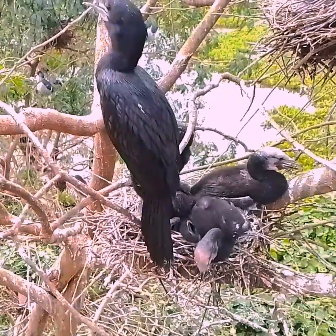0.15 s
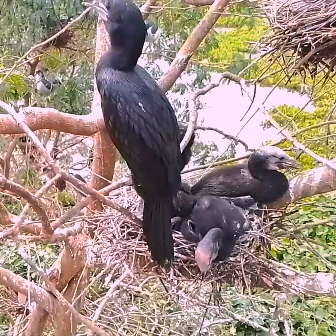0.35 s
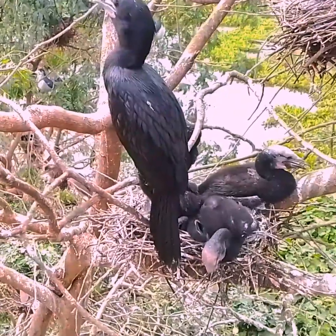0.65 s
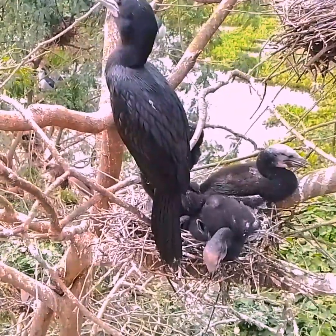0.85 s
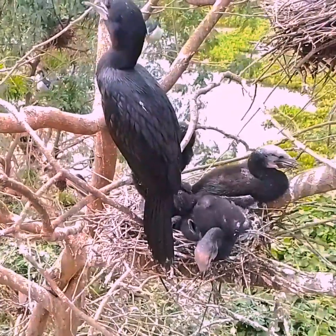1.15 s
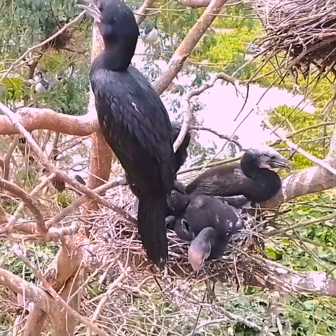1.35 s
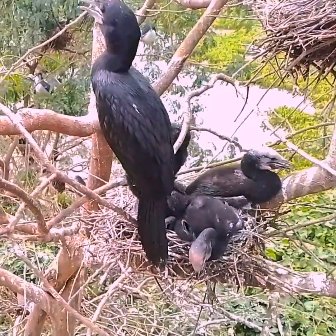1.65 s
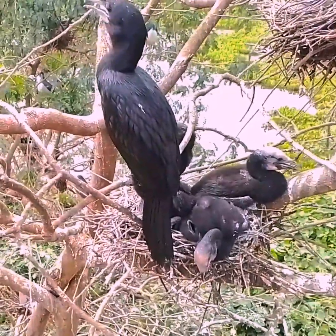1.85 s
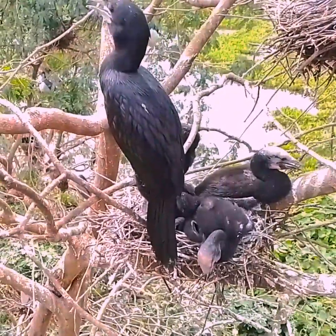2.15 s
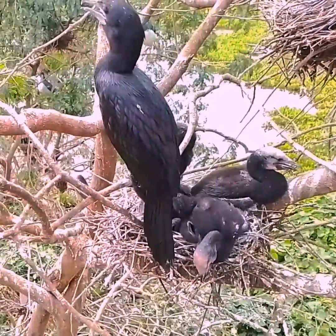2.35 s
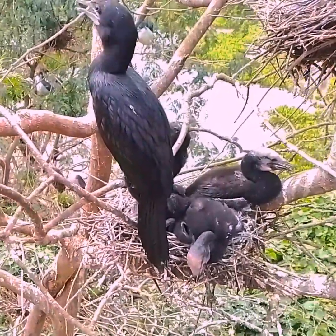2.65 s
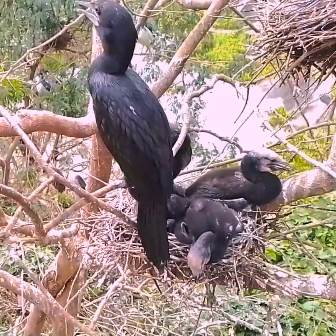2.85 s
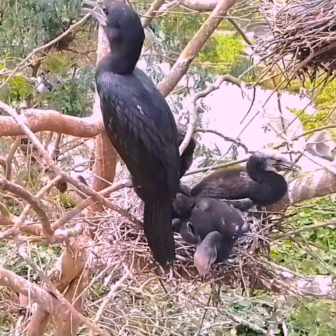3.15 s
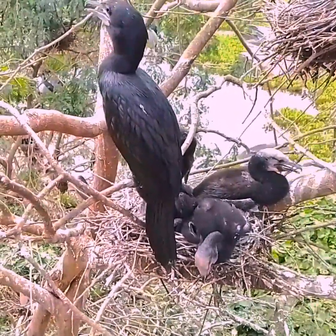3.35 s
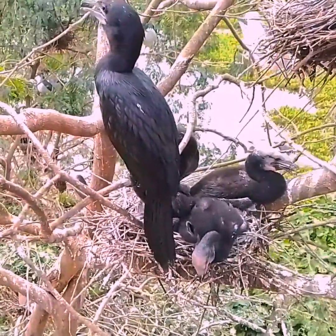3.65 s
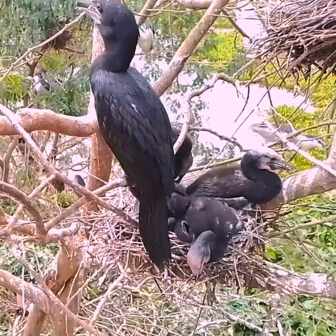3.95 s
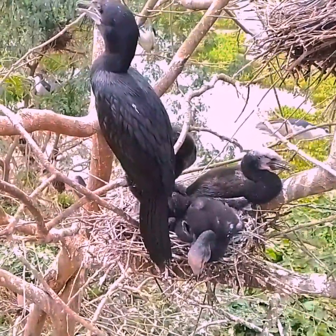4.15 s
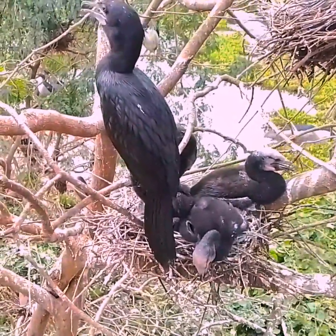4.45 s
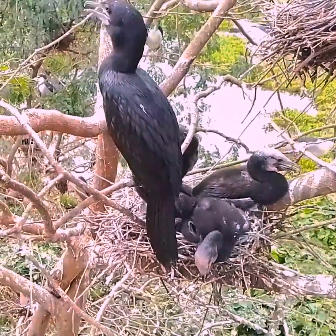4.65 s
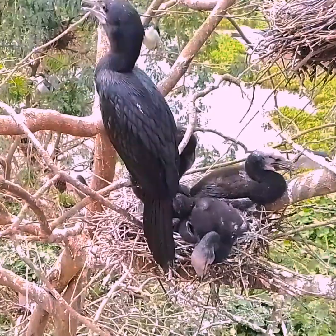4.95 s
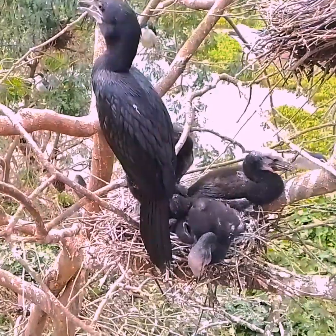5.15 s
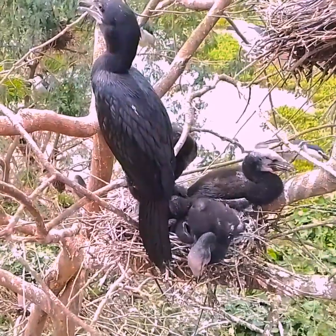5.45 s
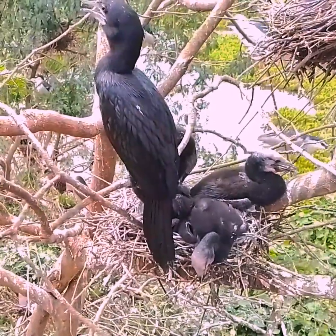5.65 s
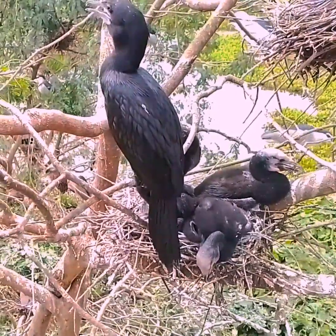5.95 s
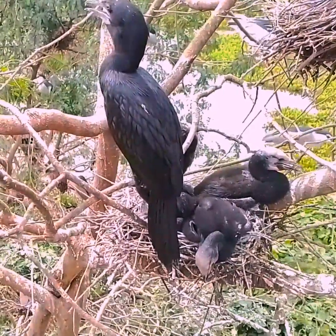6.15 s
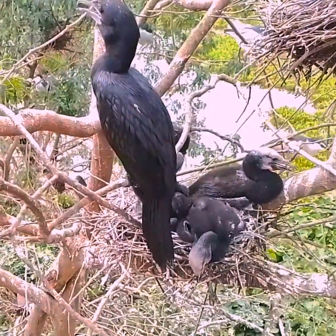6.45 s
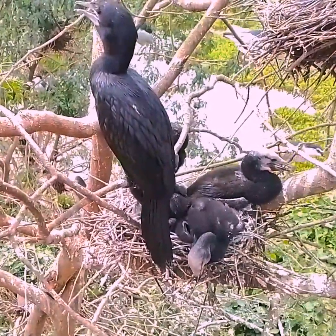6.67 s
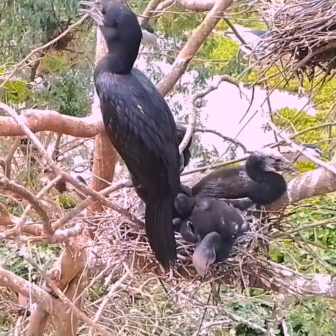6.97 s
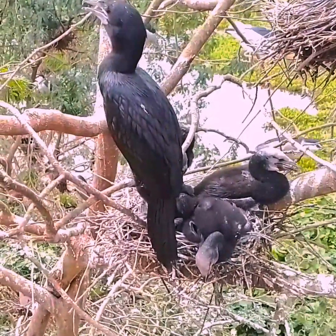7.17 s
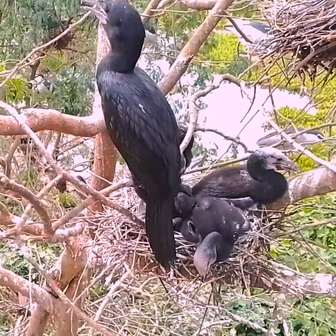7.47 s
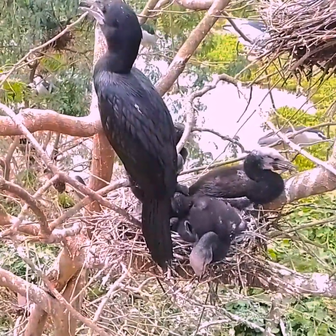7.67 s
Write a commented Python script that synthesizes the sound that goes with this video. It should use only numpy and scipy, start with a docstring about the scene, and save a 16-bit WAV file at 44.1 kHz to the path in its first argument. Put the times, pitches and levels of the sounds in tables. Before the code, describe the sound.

A nesting colony of waterbirds chatters and clicks, joined by raspy, wheezy calls, a few short barks and a light breeze.

```python
"""Waterbird chicks beg all round in short rattling chaks: throat pulses filtered by throat and beak.
An adult barks three arched kwoks, other birds whistle thinly, cry and cluck, and two hoarse ones rasp
by driving turbulent breath through resonances. The far colony blurs into a bed of noise, and leaves
and trunks scatter echoes. The scene is heard by a phone with two unlike ports, buffeted by a breeze."""
import sys
import numpy as np
from scipy import signal
from scipy.fft import rfft, irfft, next_fast_len
from scipy.io import wavfile
from scipy.ndimage import uniform_filter1d, map_coordinates

SR = 44100
rng = np.random.default_rng(int(sys.argv[2]) if len(sys.argv) > 2 else 0)


def int16_out(signal):
    """Quantize to a 16-bit WAV file."""
    q = np.round(np.clip(np.atleast_2d(signal).T, -1, 1) * 32767)
    wavfile.write(sys.argv[1], SR, q.astype(np.int16))


N = 344421

# Begging chaks. Each row: start in seconds, level in dB, left minus right in dB, brightness in dB,
# length in seconds.
CHAKS = [(0.079, -40, 9, -7, 0.024), (0.201, -46.5, 7, 2, 0.0089), (0.254, -43, -2, -7, 0.016),
         (0.328, -38.5, 9.5, -7.5, 0.023), (0.495, -46.5, -1, -8, 0.06), (0.577, -38.5, 9, -1, 0.025),
         (0.602, -42.5, 7, -3, 0.022), (0.7, -46, 1, -17, 0.032), (0.808, -39.5, 9, -5, 0.026),
         (0.294, -46.5, 0, -10, 0.014), (0.853, -45.5, 3, -13, 0.016), (0.935, -49.5, 4.5, -18, 0.0081),
         (1.085, -46, 5, -9, 0.015), (1.035, -37, 9, -3, 0.015), (1.261, -40, 8.5, -7.5, 0.021),
         (1.318, -45.5, 5, -6, 0.02), (1.684, -45.5, 6, 0, 0.024), (1.921, -46, 3, -6, 0.064),
         (2.19, -42.5, 6.5, -5, 0.04), (2.432, -44.5, 4, -1, 0.013), (2.459, -39.5, 1, -4, 0.047),
         (2.661, -32.5, 9, -8, 0.026), (3.411, -38.5, 6, -8.5, 0.024), (3.551, -33, 5.5, 3, 0.02),
         (3.652, -36, 5, -13, 0.018), (3.807, -41, -1, -24, 0.045), (3.872, -35.5, -1.5, -7.5, 0.044),
         (4.0325, -36.5, -6, -8, 0.037), (4.117, -41.5, -7, -8, 0.037), (4.178, -34, -5.5, 0, 0.014),
         (4.264, -31.5, -5.5, -7.5, 0.015), (4.462, -32, -6, -6.5, 0.028), (4.561, -42, -8, -5, 0.017),
         (4.686, -28.5, -4, -7, 0.016), (4.777, -47, -4, -10, 0.022), (4.808, -46, -8, -5, 0.024),
         (4.898, -28.5, -2.5, -7.5, 0.018), (4.924, -47, -1, -8, 0.015), (5.035, -48, 6, -9, 0.034),
         (5.11, -28.5, -0.5, -9, 0.024), (5.141, -42, -5, -16, 0.023), (5.219, -36, -1, -8, 0.016),
         (5.277, -44.5, 1, -13, 0.019), (5.508, -40, 7, -9, 0.036), (5.5964, -30, 4, -4, 0.016),
         (5.727, -46.5, 7, -13, 0.04), (5.784, -39.5, 1, 13, 0.022), (5.8478, -32, -2.5, -7, 0.019),
         (5.981, -43.5, 6, -3, 0.022), (6.054, -41, 0, -6, 0.024), (6.076, -33, 6, -5, 0.026),
         (6.108, -46, 4, -9, 0.013), (6.296, -32.5, 7, -5, 0.022), (6.321, -50, 5.5, -11, 0.02),
         (6.505, -41.5, 6.5, -9, 0.03), (6.53, -33, 8, -7, 0.027), (6.556, -45, 6.5, -8, 0.047),
         (6.599, -38, 7, -8, 0.018), (6.7453, -34.5, 7, -11.5, 0.027), (6.777, -39, 9, -8, 0.029),
         (6.838, -44.5, 8, -7, 0.018), (6.896, -43, 7.5, -2, 0.015), (6.964, -36.5, 5, -6, 0.023),
         (6.986, -36.5, 6.5, -10.5, 0.024), (7.055, -42, 6, -3, 0.029), (7.105, -46, 2.5, -9, 0.018),
         (7.762, -48.5, 2, -11, 0.027), (7.212, -46.5, 7, -5, 0.029), (7.439, -45, 7.5, -10.5, 0.039),
         (7.644, -40.5, 4, -10, 0.051)]
# A chick's resonances. Each row: centre in Hz, width in Hz, gain in dB.
THROAT_MODES = [(615, 156, -9), (1364, 280, -11.5), (2080, 320, -5.5), (3164, 520, 7), (4337, 1030, 2)]
BEAK_MODES = [(5740, 880, 5.5), (7160, 250, 8), (7060, 1140, 5.5), (12200, 2330, 3)]
# A bill shutting: start in seconds, level in dB.
BILL_SNAP = (4.7505, -26.5)
# Duller chaks. Each row: start in seconds, level in dB, resonance in Hz, left minus right in dB.
PEEPS = [(3.149, -43, 3920, 4), (5.06, -48, 3900, -3), (4.1237, -44.5, 4010, -4), (5.9299, -51, 4600, 7),
         (6.1804, -51.5, 3870, 5), (6.2042, -46.5, 2786, 0), (6.414, -49, 2630, -1),
         (7.2443, -44.5, 2390, -2), (7.4647, -41, 2360, -5), (7.675, -43.5, 2440, -4)]
# Adult barks. Each row: start, climb, hold and whole length in seconds, first and top pitch in Hz,
# level in dB.
KWOKS = [(2.196, 0.037, .006, 0.072, 409.6, 810, -40), (2.572, 0.042, 0.017, 0.088, 413.3, 932, -37.5),
         (3.136, 0.037, .021, 0.08, 352, 630.4, -38)]
# The two sides of a kwok's arch. Each row: share of that side's time, share of the pitch rise, gain in dB.
ARCH_UP = [(0, 0.014, -5.5), (0.549, .3, -3.5), (0.999, 1, 0)]
ARCH_DOWN = [(0, 0.94, -1.5), (0.399, .3, -0.5), (1, .2, -1)]
# Gliding calls. Each row: start and length in seconds, first and last pitch in Hz, level in dB.
WHISTLES = [(3.663, 0.03, 1513, 1630, -37), (3.709, 0.1, 3275, 3445, -49),
            (3.798, 0.1132, 3510, 3290, -46.5), (6.541, 0.13, 1003, 1300, -65)]
CRIES = [(6.638, 0.095, 1316, 1200, -63), (7.489, 0.12, 1295, 1200, -65.5)]
# Spectral envelopes of the voices. Each row: frequency in Hz, gain in dB.
KWOK_FORMANTS = [(300, -3), (550, -5), (1300, -8), (1900, 5), (2350, 8), (2800, -15), (4400, -21),
                 (6100, 5), (6800, -14), (7500, -8.5), (9800, -9.5), (14000, -25)]
CRY_FORMANTS = [(1200, -14), (2550, 4.5), (3900, -26), (5200, -25), (6400, -16), (7700, 8.5), (9000, -14)]
# Hoarse calls. Each row: start, loudest moment and end in seconds, first and last resonance in Hz,
# level in dB and, for the rasps only, hiss level in dB.
WHINES = [(.45, .68, 0.83, 3320, 3150, -65), (2.5, 2.85, 3.03, 3230, 3340, -50),
          (3.07, 3.12, 3.4, 3300, 3177, -54.5), (3.3, 3.5, 3.82, 3140, 3380, -52.5),
          (3.705, 3.76, 3.93, 3294, 3477, -54.5), (4.2, 4.45, 4.62, 3224, 3085, -57.5),
          (4.98, 5.17, 5.35, 3288, 2950, -61.5)]
RASPS = [(.45, .71, 0.82, 2293, 2022, -69.5, -62), (1.52, 1.7, 1.85, 2116, 2140, -73, -66),
         (2.45, 2.88, 3.06, 2090, 2030, -61.5, -53.5), (3.06, 3.14, 3.25, 2020, 1950, -55.5, -56),
         (3.31, 3.45, 3.74, 1943, 1910, -64.5, -52.5), (3.745, 3.88, 3.92, 2116, 2143, -57, -46),
         (3.96, 4.2, 4.3, 2180, 2190, -56, -53), (4.305, 4.42, 4.59, 2250, 1960, -54, -48.5),
         (4.605, 4.72, 4.89, 2030, 1872, -64, -67), (5.05, 5.42, 5.56, 1905, 2114, -70.5, -64.5),
         (7.3, 7.45, 7.6, 2204, 2436, -65, -66)]
# Resonances of their hiss. Each row: centre in Hz, width in Hz, gain in dB.
WHINE_MODES = [(2313, 250, -0.5), (7530, 540, -0.5), (8200, 470, -4.5), (9080, 330, 3)]
RASP_MODES = [(9900, 1100, -3), (10950, 450, 1.5), (11800, 1100, -2), (13300, 1500, -4)]
# Flares of the rasp's hiss. Each row: start and length in seconds, gain in dB.
HISS_FLARES = [(2.867, 0.019, 11), (3.092, 0.011, 11), (4.464, .022, 6.5)]
# Far hollow clucks. Each row: start in seconds, level in dB, frequency in Hz.
CLUCKS = [(1.303, -55, 1145), (1.495, -56, 1126), (1.655, -54, 1200), (1.792, -52, 1290)]
# Level of the background noise and far chatter, dipping briefly before and after the last kwok.
# Each row: time in seconds, level in dB.
BACKGROUND_LEVELS = [(0.0, -66), (1.3, -63), (2.15, -64), (2.45, -59.5), (2.7, -54), (2.9, -53.5),
                     (3.0, -69.5), (3.15, -49), (3.26, -61.5), (3.36, -55), (3.85, -59.5), (3.96, -64.5),
                     (4.46, -60.5), (5.0, -63), (7.81, -63)]
# Spectra of the far bed and the wind. Each row: frequency in Hz, relative level in dB.
BED_SPECTRUM = [(150, -65), (250, -28), (312, -0.5), (546, -0.5), (957, -8.5), (1110, -9.5), (1620, -3),
                (2940, -1), (6530, -4.5), (7730, 2.5), (14500, -15)]
RUMBLE_SPECTRUM = [(15, -36), (35, -0.5), (60, 0), (115, -3.5), (160, -18.5), (300, -48)]
FLUTTER_SPECTRUM = [(100, -32), (150, -43), (200, -2), (290, 3), (420, -2), (800, -13), (3000, -43)]
# Echo decay among the trees. Each row: frequency in Hz, seconds to fall by 60 dB.
ECHO_DECAY = [(300, 0.31), (3000, 0.15), (10000, 0.12)]
# Gusts. Each row: strongest moment in seconds, seconds to fall by 10 dB, rumble and flutter in dB.
GUSTS = [(.2, 0.96, -66.5, -73.5), (2.7, 1.2, -72.5, -89), (3.66, 0.5, -78.5, -101), (4.8, 0.5, -73, -77),
         (6.62, 0.4, -72, -91), (7.3, 0.1, -63, -68.5), (7.7, 1, -64, -72)]
# Puffs of air at the left port. Each row: start in seconds, level in dB, frequency in Hz.
PUFFS = [(.19, -48, 266), (0.19, -49, 100), (.232, -46, 280), (.255, -45.5, 247), (2.542, -43, 298),
         (3.664, -51, 266), (4.713, -51, 105.2), (6.634, -51, 248), (7.354, -52.5, 278),
         (7.633, -49.5, 100), (7.69, -47, 294), (7.72, -44, 237), (7.741, -42, 105), (7.769, -41.5, 230)]
# Port responses. Each row: frequency in Hz, gain in dB.
LEFT_PORT = [(200, -4.5), (2000, 3), (5000, -0.5), (7700, 6.5), (9500, -2), (11000, -14), (14500, -8.5)]
RIGHT_PORT = [(200, 0), (2000, 5), (5000, 2.5), (8000, -3.5), (9500, 3.5), (11000, 9), (14500, -8.5)]

CREST_DB = 8.5  # a chak's peak over its mean level
CALM_RUMBLE_DB, CALM_FLUTTER_DB = -83.5, -78
BAND_LIMIT_HZ = 14350


def chak(bright_db, length, pitch_offset, throat_offset):
    """Source and filter: breathy pulses ring throat and beak. Pitch and colour vary from chak to chak."""
    t = np.arange(SR // 16) / SR
    jitter = 1 + .2 * uniform_filter1d(rng.standard_normal(len(t)), 20)
    phase = np.cumsum(690 * (1 + .04 * pitch_offset) * jitter) / SR
    cycle = phase.astype(int)
    shimmer = amp(1.3 * rng.standard_normal(99))[cycle]
    aspiration = 0.17 * amp(-12.5 * (phase % 1)) * rng.standard_normal(len(t))
    pulses = (np.diff(cycle, prepend=0) + aspiration) * shimmer
    progress = t / max(length, .006)
    pulses *= np.sin(np.pi / 2 * np.clip(progress / 0.33, 0, 1)) * amp(-45 * np.clip(progress - .8, 0, 9))
    throat = modes(THROAT_MODES, shift=1 + 0.04 * throat_offset)
    beak = modes(BEAK_MODES, shift=1 + 0.03 * pitch_offset)
    call = filtered(pulses, lambda f: throat(f) + amp(bright_db + 5.5) * beak(f))
    return unit(call) * np.sqrt(length / t[-1])


def chicks():
    """Differences of level and arrival time between the ports give each near chak its direction."""
    bus = np.zeros((2, N))
    for (start, db, pan_db, bright_db, length), offsets in zip(CHAKS, rng.standard_normal((len(CHAKS), 2))):
        lag = np.clip(49 - 6.5 * pan_db, -14, 22)  # the ports lie a hand apart
        add(bus, amp(db - CREST_DB) * chak(bright_db, length, *offsets), start - .003, pan_db, lag)
    return bus


def bill_snap():
    """Impact excitation: a closing bill sends a brief noise burst through one high resonance."""
    bus, t = np.zeros((2, N)), np.arange(300) / SR
    start, db = BILL_SNAP
    burst = amp(db - 60 * t / 0.015) * rng.standard_normal(len(t))
    add(bus, filtered(burst, modes([(10200, 2200, 0.0012)])), start, pan_db=-3, lag=22)
    return bus


def peeps():
    """Amplitude modulation: smaller chicks pulse their breath into a resonance and a weak upper one."""
    bus, t = np.zeros((2, N)), np.arange(SR // 20) / SR
    progress = t / 0.03
    for start, db, hz, pan_db in PEEPS:
        pulses = (1 + np.cos(2 * np.pi * 600 * t)) * rng.standard_normal(len(t))
        throat = modes([(hz, 390, 0), (2.1 * hz, 900, -9)])
        call = filtered(pulses * progress * amp(-40 * progress), lambda f: throat(f) ** 2)
        add(bus, amp(db) * call / np.abs(call).max(), start - .002, pan_db, lag=12)
    return bus


def voice(contour, weight, harmonics, rough):
    """A harmonic series on a wavering (seconds, Hz, dB) contour; breath roughens high partials most."""
    t = np.arange(contour[0][0], contour[-1][0], 1 / SR)
    hz, db = curves(contour, t)
    k = np.arange(1, harmonics + 1)[:, None]
    waver = unit(uniform_filter1d(rng.standard_normal(len(t)), size=600))
    hz = uniform_filter1d(hz, 200) * (1 + .006 * waver)
    depth = rough * (k * hz / 2000) ** 3
    noise = unit(uniform_filter1d(rng.standard_normal((harmonics, len(t))), size=70, axis=1))
    fuzz = (1 + depth * noise) / np.sqrt(1 + depth ** 2)
    partials = np.cos(2 * np.pi * k * np.cumsum(hz) / SR + 0.0417 * k ** 2)
    return np.sum(weight(k, hz) * fuzz * partials, axis=0) * amp(db) * signal.windows.tukey(len(t), .25)


def kwoks():
    """Formant filtering: an adult's harmonics arch through the fixed resonances of a wide throat."""
    def weight(k, hz):
        return amp(along(KWOK_FORMANTS, k * hz)) * (k * hz < BAND_LIMIT_HZ) * np.sqrt(hz / 900)

    bus = np.zeros((2, N))
    for start, climb, hold, length, first_hz, top_hz, db in KWOKS:
        arch = [(share * climb, *rest) for share, *rest in ARCH_UP]
        arch += [(climb + hold + share * (length - climb - hold), *rest) for share, *rest in ARCH_DOWN]
        contour = [(start + s, first_hz + rise * (top_hz - first_hz), db + gain) for s, rise, gain in arch]
        add(bus, voice(contour, weight, harmonics=30, rough=.15), start, pan_db=-.8, lag=11)
    return bus


def whistles():
    """A gliding fundamental with one faint overtone is heard as a thin whistle."""
    bus = np.zeros((2, N))
    for start, length, first_hz, last_hz, db in WHISTLES:
        glide = [(start, first_hz, db), (start + length, last_hz, db)]
        call = voice(glide, lambda k, hz: amp(-24 * (k - 1)), harmonics=2, rough=.35 * (2000 / first_hz) ** 3)
        add(bus, call, start, pan_db=-.8, lag=11)
    return bus


def cries():
    """Formants lift overtones above the fundamental of a call that falls and fades."""
    bus = np.zeros((2, N))
    for start, length, first_hz, last_hz, db in CRIES:
        glide = [(start, first_hz, db), (start + length, last_hz, db - 5)]
        call = voice(glide, lambda k, hz: amp(along(CRY_FORMANTS, k * hz)), harmonics=7, rough=.03)
        add(bus, call, start, pan_db=2.5, lag=4)
    return bus


def whine_ahead():
    """Narrow resonances give turbulent breath a pitch: a hoarse, hissing whine."""
    gate, hz, db = phrases(WHINES, swell_db=10, fade_db=11)
    hiss = unit(filtered(breath(shared_gain=0.4, lag=11, rough_db=1.4), modes(WHINE_MODES)))
    upper = throat_band(hz, width_hz=115, rough_db=2.5)
    lower = throat_band(.38 * hz, width_hz=90, rough_db=4)
    return gate * amp(db) * (upper + amp(3.5) * hiss + amp(-13) * lower)


def rasp_right():
    """Wider, lower resonances turn breath into a rasp, under a high hiss that flares."""
    gate, hz, db, hiss_db = phrases(RASPS, swell_db=5.5, fade_db=3.5)
    t = np.arange(N) / SR
    flare_db = sum(gain * ((t > start) & (t < start + length)) for start, length, gain in HISS_FLARES)
    hiss_db += uniform_filter1d(flare_db * 1., size=60) + 1.2 * wobble(21.95)[0]
    throat = throat_band(hz, width_hz=210, rough_db=1)
    throat += amp(-6.5) * throat_band(.81 * hz, width_hz=147, rough_db=4)
    hiss = unit(filtered(breath(shared_gain=0.42, lag=14, rough_db=2.2), lambda f: modes(RASP_MODES)(f) ** 2))
    return gate * (amp(db) * throat * amp([[-4], [4]]) + amp(hiss_db) * hiss * amp([[-5], [5]]))


def breath(shared_gain, lag, rough_db):
    """Turbulence is noise in uneven bursts, only partly coherent between the ports."""
    own, shared = rng.standard_normal((2, N)), rng.standard_normal(N)
    noise = shared_gain * np.array([np.roll(shared, lag), shared]) + np.sqrt(1 - shared_gain ** 2) * own
    return amp(rough_db * wobble(240) + 0.3 * wobble(28)) * noise


def throat_band(hz, width_hz, rough_db):
    """Quadrature modulation centres breath on a wavering resonance, width_hz to either side."""
    slow = [filtered(breath(0.31, 44, rough_db), lambda f: 1 / (1 + (f / width_hz) ** 4)) for _ in range(2)]
    phase = 2 * np.pi * np.cumsum(hz * (1 + 0.00581 * wobble(40)[0])) / SR
    return unit(slow[0] * np.cos(phase) + slow[1] * np.sin(phase))


def phrases(calls, swell_db, fade_db):
    """Envelopes of calls that swell and fade: a gate shut between them, resonance in Hz, levels in dB."""
    t, rows = np.arange(N) / SR, []
    for start, loudest, end, first_hz, last_hz, *db in calls:
        hz = np.interp(loudest, [start, end], [first_hz, last_hz])
        rows += [(start, first_hz, *np.subtract(db, swell_db)),
                 (loudest, hz, *db),
                 (end, last_hz, *np.subtract(db, fade_db))]
    gate = sum((t > start) & (t < end) for start, _, end, *_ in calls) > 0
    return uniform_filter1d(gate * 1., size=1800), *curves(rows, t)


def clucks():
    """Heavily damped oscillations are heard as short hollow knocks."""
    return knocks(CLUCKS, samples=SR // 25, t60=0.055, attack_s=0.00045, pan_db=-1.5, lag=12)


def colony(count):
    """Superposition: far chaks at random moments blur with their echoes, over a bed of farther ones."""
    level_db, = curves(BACKGROUND_LEVELS, np.arange(N) / SR)
    bed = unit(filtered(patches(depth_db=4.5), lambda f: amp(along(BED_SPECTRUM, f))))
    bus = np.zeros((2, N))
    for (when, side), (pitch, throat, size) in zip(rng.random((count, 2)), rng.standard_normal((count, 3))):
        call = amp(1.8 * size) * chak(-10 + 5 * throat, 0.018, 3 * np.tanh(pitch), 3 * np.tanh(throat))
        add(bus, call, when * N / SR, pan_db=8 * side - 4, lag=22 - 36 * side)
    flicker = amp(-0.5 + 6.4 * np.tanh(wobble(30, channels=2)))
    chatter = unit(bus + amp(-4) * trees(bus))
    return amp(level_db) * (flicker * bed + amp(3) * chatter)


def patches(depth_db):
    """Many unresolved calls merge into noise whose level varies in patches of time and frequency."""
    spectrum = signal.stft(rng.standard_normal((2, N)), nperseg=512)[2]
    field = uniform_filter1d(rng.standard_normal(spectrum.shape[1:]), size=6, axis=0)
    field = uniform_filter1d(field, size=6, axis=1)
    return signal.istft(spectrum * amp(depth_db * unit(field)), nperseg=512)[1][:, :N]


def trees(x):
    """Scattering by leaves and trunks leaves a diffuse tail whose treble dies first."""
    hz, t, spectrum = signal.stft(rng.standard_normal((2, SR // 3)), SR, nperseg=256)
    tail = signal.istft(spectrum * amp(-60 * t / along(ECHO_DECAY, hz)[:, None]), SR, nperseg=256)[1]
    delayed = np.pad(x, ((0, 0), (500, 0)))
    return signal.fftconvolve(delayed, tail / np.linalg.norm(tail[0]), axes=1)[:, :N]


def breeze():
    """Turbulent pressure buffets each port independently; now and then a puff knocks the left one."""
    rumble_gain, flutter_gain = gusts()
    rumble = unit(filtered(rng.standard_normal((2, N)), lambda f: amp(along(RUMBLE_SPECTRUM, f))))
    flutter = unit(filtered(rng.standard_normal((2, N)), lambda f: amp(along(FLUTTER_SPECTRUM, f))))
    bus = rumble_gain * amp(2.1 * wobble(28, channels=2) + [[3], [-3]]) * rumble
    bus += flutter_gain * amp(4.95 * wobble(16, channels=2) + [[4], [-4]]) * flutter
    return bus + knocks(PUFFS, samples=SR // 10, t60=0.045, attack_s=0.0024, pan_db=18, lag=0)


def gusts():
    """Exponential envelopes over calm air: each gust rises five times as fast as it dies."""
    strongest, decay_s, *levels = np.transpose(GUSTS)[:, :, None]
    age = (np.arange(N) / SR - strongest) / decay_s
    shape_db = -10 * np.maximum(age, -age / 0.2)
    return [amp(calm_db) + amp(top_db + shape_db).sum(axis=0)
            for calm_db, top_db in zip((CALM_RUMBLE_DB, CALM_FLUTTER_DB), levels)]


def knocks(rows, samples, t60, attack_s, pan_db, lag):
    """Damped sinusoids with a soft onset, falling by 60 dB in t60 seconds."""
    bus, t = np.zeros((2, N)), np.arange(samples) / SR
    for start, db, hz in rows:
        envelope = amp(db - 60 * t / t60) * (1 - np.exp(-t / attack_s))
        add(bus, envelope * np.sin(2 * np.pi * hz * t), start, pan_db, lag)
    return bus


def amp(db):
    """Amplitude ratio of a level in dB."""
    return 10 ** (np.asarray(db) / 20)


def unit(x):
    """Normalisation to an rms of 1."""
    return x / np.sqrt(np.mean(x ** 2) + 1e-20)


def along(points, hz):
    """Interpolation of (Hz, value) points on a logarithmic frequency axis."""
    f, values = np.transpose(points)
    return np.interp(np.log(hz + 1), np.log(f + 1), values)


def curves(rows, t):
    """Linear interpolation, at times t, of each column after the time."""
    times, *columns = np.transpose(rows)
    return [np.interp(t, times, column) for column in columns]


def wobble(rate, channels=1):
    """Smooth random modulation with rate knots a second."""
    position = np.arange(N) * rate / SR
    return np.array([map_coordinates(rng.standard_normal(2000), [position]) for _ in range(channels)])


def filtered(x, response):
    """Linear filtering: the spectrum of x times a frequency response."""
    size = next_fast_len(x.shape[-1] + 2048)
    return irfft(rfft(x, size) * response(np.fft.rfftfreq(size, 1 / SR)), size)[..., :x.shape[-1]]


def modes(table, shift=1):
    """Response of parallel second-order resonators of alternating sign; shift scales their centres."""
    return lambda f: sum((-1) ** k * amp(db) * 1j * f * width / ((shift * hz) ** 2 - f * f + 1j * f * width)
                         for k, (hz, width, db) in enumerate(table))


def add(bus, x, start, pan_db, lag):
    """Stereo placement: the left port hears x pan_db louder and lag samples later than the right."""
    for port, sign in enumerate((1, -1)):
        part = bus[port, max(round(start * SR + sign * lag / 2), 0):][:len(x)]
        part += amp(sign * pan_db / 2) * x[:len(part)]


def scene():
    """The pressures of birds, echoes and wind add linearly."""
    young = chicks() + bill_snap() + peeps()
    adults = kwoks() + whistles() + cries() + clucks()
    echoes = trees(amp(-13) * young + amp(-13.5) * adults)
    return young + adults + echoes + whine_ahead() + rasp_right() + colony(count=360) + breeze()


def record(dry):
    """Each port has its own frequency response and passes nothing above the band limit."""
    return filtered(dry, lambda f: amp([along(LEFT_PORT, f), along(RIGHT_PORT, f)]) * (f < BAND_LIMIT_HZ))


dry = scene()
out = record(dry)
int16_out(out)
```